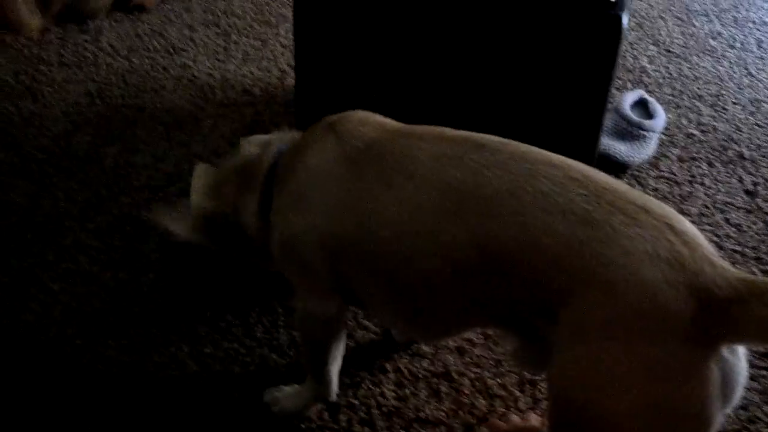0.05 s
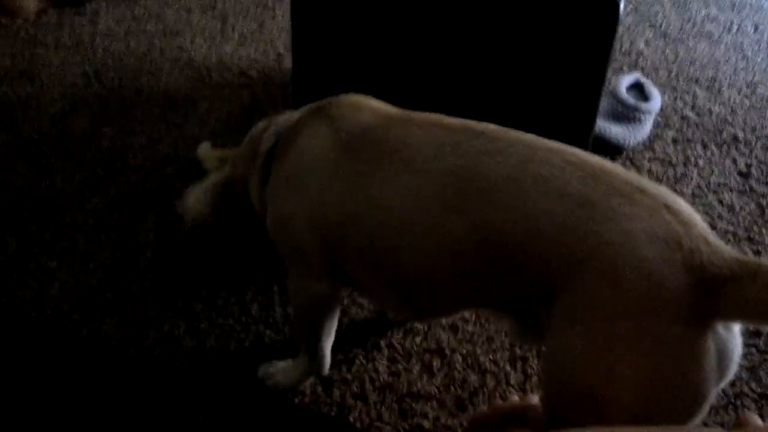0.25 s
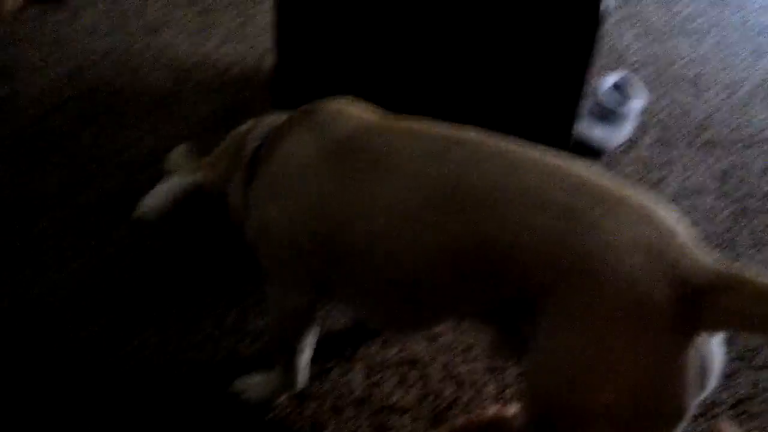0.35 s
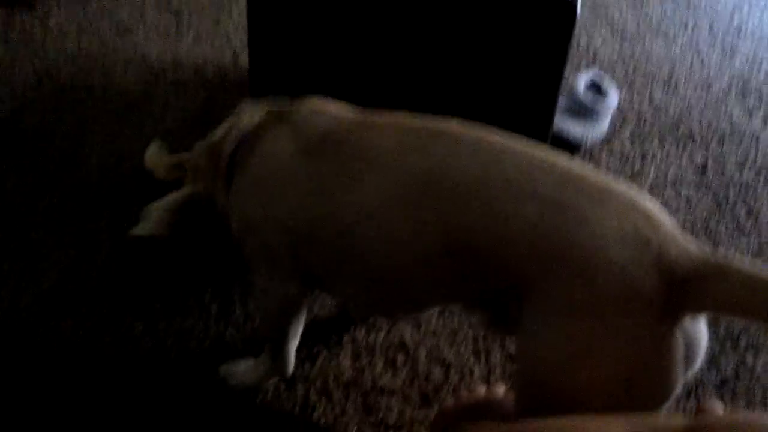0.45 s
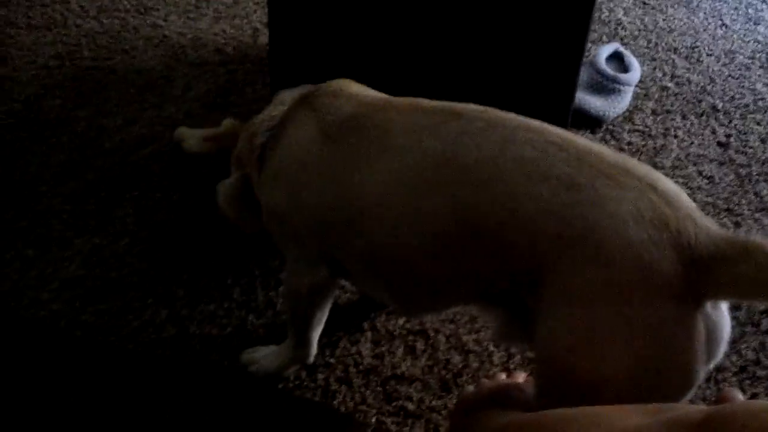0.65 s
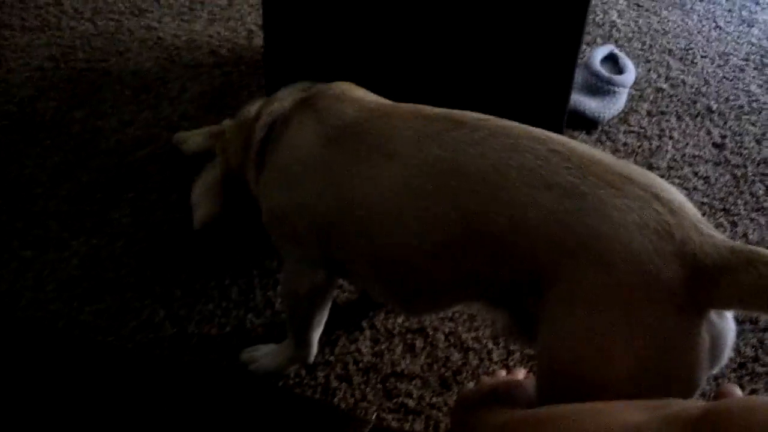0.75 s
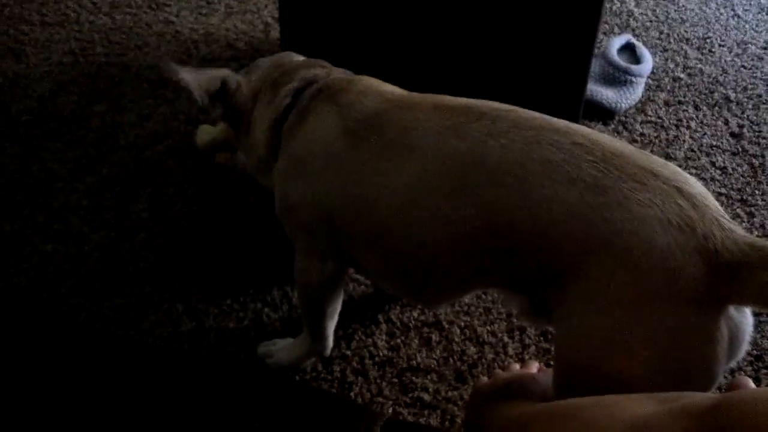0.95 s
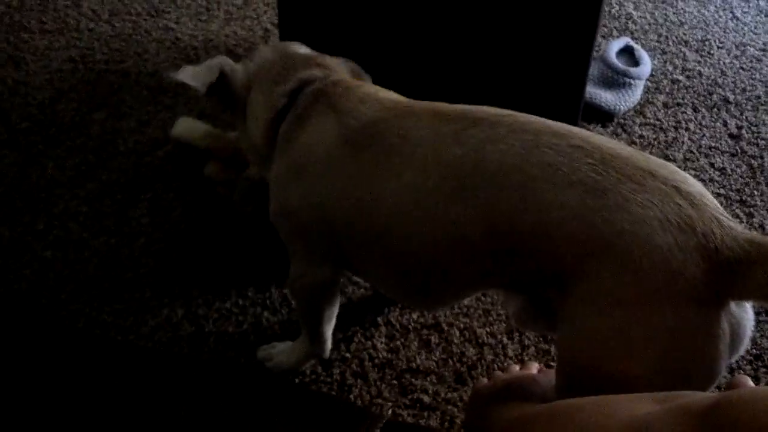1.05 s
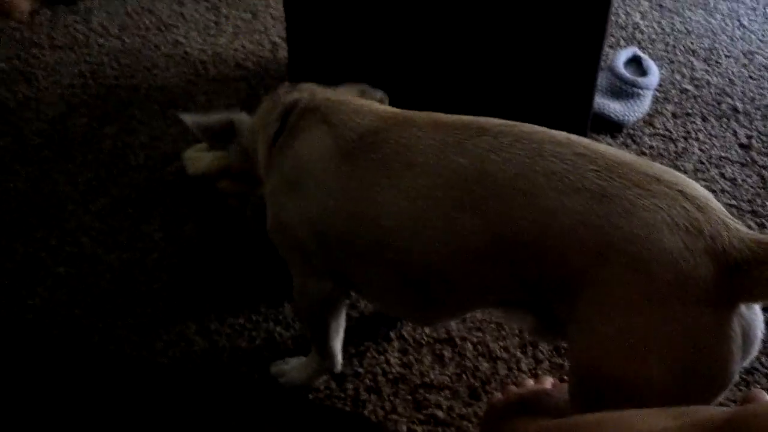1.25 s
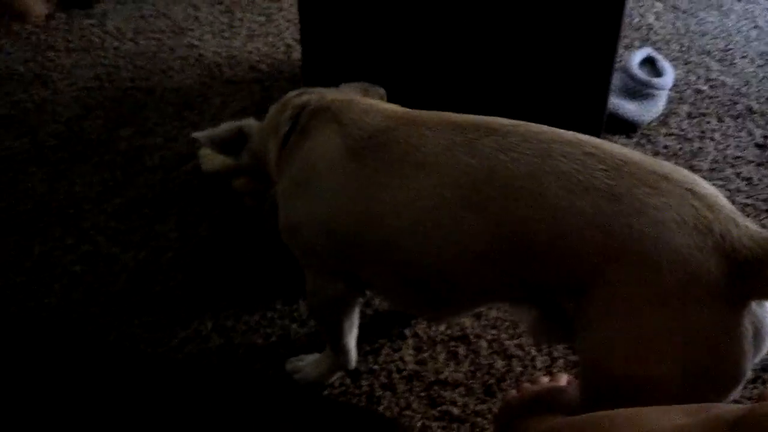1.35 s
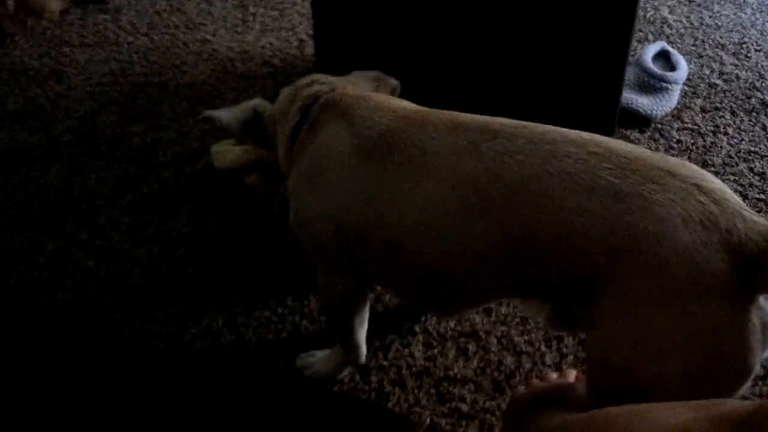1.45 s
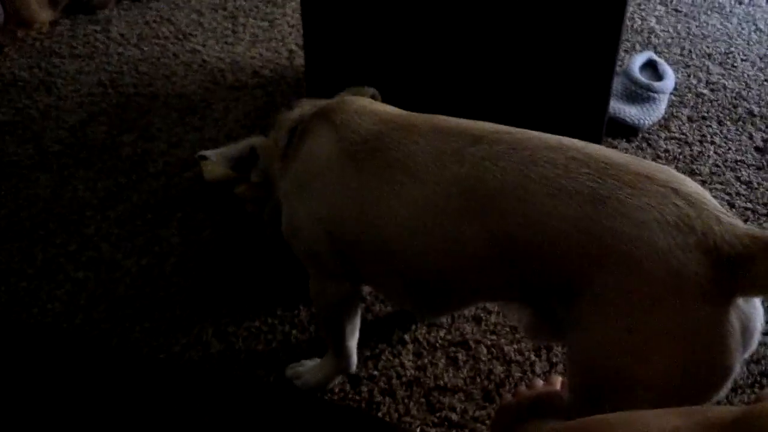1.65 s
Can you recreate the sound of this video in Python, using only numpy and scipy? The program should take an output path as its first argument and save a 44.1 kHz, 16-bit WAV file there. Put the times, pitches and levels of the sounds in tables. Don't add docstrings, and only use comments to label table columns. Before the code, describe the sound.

Three brief reedy squeaks from a dog's chew toy in the first second, the second shrillest, then quiet room air and low household rumble. Close pickup, left of centre, with a short room tail.

```python
import sys
import numpy as np
from scipy import signal
from scipy.fft import rfft, irfft, next_fast_len
from scipy.io import wavfile
from scipy.ndimage import uniform_filter1d

SR = 44100
rng = np.random.default_rng(int(sys.argv[2]) if len(sys.argv) > 2 else 0)


def log_audio(samples):
    frames = np.atleast_2d(samples).T
    limited = np.clip(frames, -1, 1)
    pcm = np.round(limited * 32767).astype(np.int16)
    wavfile.write(sys.argv[1], SR, pcm)


def invert_db(level):
    return 10 ** (np.asarray(level, dtype=float) / 20)


N = 74970

# frequency [Hz], density [dB per Hz].
FLOOR_SPECTRUM = [(40, -28.5), (110, 3), (190, -2.5), (350, -16.5), (1000, -23.5), (3000, -30.5),
                  (9000, -45), (15000, -46.5)]
# centre [s], length [s], level [dB].
LEAKS = [
    (.126, .02, -70),
    (.197, .025, -71),
    (1.47, .05, -78),
    (1.635, .075, -69),
]
# time [s], reed pitch [Hz], level [dB].
SQUEAKS = [
    [(.2112, 850, -36.5), (.2128, 1337, -31), (.234, 1421, -33.5), (.262, 1555, -24.5), (.285, 1690, -24.5),
     (.31, 1685, -32), (.326, 1472, -24.5), (.344, 1153, -43.5), (.358, 906, -51)],
    [(.639, 1050, -48.5), (.641, 1335, -31.5), (.662, 1660, -24.5), (.681, 2020, -19), (.693, 2800, -25.5),
     (.699, 3950, -50.5), (.719, 4480, -21.5), (.735, 4400, -44.5), (.75, 4400, -57)],
    [(.837, 4844, -41), (.8382, 4527, -24), (.841, 3430, -25), (.844, 3326, -23), (.846, 2188, -21),
     (.855, 1500, -29), (.861, 1205, -48), (.866, 1043, -49)],
]
# time [s], pitch [Hz], level [dB].
WHISTLES = [
    [(.262, 1660, -49.5), (.272, 1769, -30.5), (.29, 1835, -20), (.3, 1878, -40), (.311, 1637, -39)],
    [(.692, 3864, -42.5), (.696, 4240, -21.5), (.706, 4630, -20.5), (.71, 5300, -54)],
]
# frequency [Hz], gain [dB].
BODY_COLOUR = [(400, -36), (800, 1), (1500, 1), (3200, 4.5), (5200, 3.5), (8500, -6), (11000, -12),
               (15500, -10.5)]
# delay [s], level [dB], extra lag at the right microphone [s].
ECHOES = [(.0045, -8.5, 0.00011), (0.01, -0.5, 0.000081), (0.0186, -9.5, 0.00011), (.022, -7.5, .00005),
          (.028, -6.5, .00012)]
# frequency [Hz], time to fall 60 dB [s].
ROOM_T60 = [(500, 0.15), (1500, 0.38), (4000, 0.37), (7000, 0.38), (9500, 0.21), (14000, .25)]
# frequency [Hz], gain [dB].
ROOM_COLOUR = [(1200, -6.5), (2200, -10.5), (4400, -9.5), (6700, -4.5), (12000, 2)]

TOP_CUT_HZ = 15800
RIGHT_DB = -5


def rms_one(x):
    return x / np.sqrt(np.mean(x ** 2) + 1e-20)


def at_hz(points, hz):
    p = np.array(points)
    return np.interp(np.log(np.maximum(hz, 1)), np.log(p[:, 0]), p[:, 1])


def drift(rate_hz):
    r = np.exp(-2 * np.pi * rate_hz / SR)
    noise = rng.standard_normal(N + SR)
    return rms_one(signal.lfilter([1], [1, -2 * r, r * r], noise)[SR:])


def diffuse(size):
    spacing_m, most_alike = .12, .96
    mid, side = rfft(rng.standard_normal((2, size)))
    hz = np.fft.rfftfreq(size, 1 / SR)
    alike = most_alike * np.sinc(2 * hz * spacing_m / 343)
    pair = np.sqrt(1 + alike) * mid + np.sqrt(1 - alike) * side * [[1], [-1]]
    return hz, pair / np.sqrt(2)


def bands(hz):
    steps = 2 * np.log2(np.maximum(hz, 1) / 30)
    return [(30 * 2 ** (k / 2), np.clip(1 - abs(steps - k), 0, 1)) for k in range(20)]


def background():
    level_db, patchy_db, calm_hz = -51, 4.5, 1500
    right_db, right_lag_s = -3.5, -0.00022
    hz, noise = diffuse(N)
    noise = noise * invert_db(at_hz(FLOOR_SPECTRUM, hz))
    noise[1] *= invert_db(right_db) * np.exp(-2j * np.pi * hz * right_lag_s)
    shared = drift(1.3)
    total = np.zeros((2, N))
    for centre, window in bands(hz):
        flicker_db = patchy_db / (1 + centre / calm_hz) * (0.23 * shared + drift(6.9))
        total += irfft(noise * window, N) * invert_db(flicker_db)
    return invert_db(level_db) * rms_one(total)


def body(hz):
    pipe_hz, width_hz, pipe_db = 6700, 1300, 9
    resonance_db = pipe_db / (1 + (2 * (hz - pipe_hz) / width_hz) ** 2)
    return invert_db(at_hz(BODY_COLOUR, hz) + resonance_db)


def above(hz):
    return 1 / (1 + (9500 / np.maximum(hz, 1)) ** 6)


def rushing_air():
    hz = np.fft.rfftfreq(N, 1 / SR)
    colour = body(hz) * invert_db(7 * above(hz))
    return rms_one(irfft(rfft(rng.standard_normal(N)) * colour, N))


def leaks(air):
    t, out = np.arange(N) / SR, np.zeros(N)
    for s, length, db in LEAKS:
        out += invert_db(db) * air * np.exp(-(2 * (t - s) / length) ** 2)
    return out


def reed(air):
    jitter, shimmer_db, air_db = .0035, .9, -19
    full_db = -24
    dulling = .09
    lines_top_db = -4
    t, out = np.arange(N) / SR, np.zeros(N)
    wobble, shimmer = drift(100), [drift(120) for k in range(14)]
    for rows in SQUEAKS:
        s, hz, db = np.transpose(rows)
        pitch = np.exp(np.interp(t, s, np.log(hz))) * (1 + jitter * wobble)
        phase = 2 * np.pi * np.cumsum(pitch) / SR
        level_db = np.interp(t, s, db)
        slack_db = np.clip(level_db - full_db, -30, 0)
        tone = np.zeros(N)
        for k in range(1, 15):
            line_hz = k * pitch
            line_db = dulling * (k - 4) * slack_db + lines_top_db * above(line_hz)
            line_db += shimmer_db * np.sqrt(k) * shimmer[k - 1]
            gain = invert_db(line_db) * body(line_hz) * (line_hz < TOP_CUT_HZ)
            tone += gain * np.sin(k * phase + k * k)
        pulsing_air = invert_db(air_db) * air * (1 + np.cos(phase))
        sounding = (t > s[0]) & (t < s[-1])
        out += invert_db(level_db) * sounding * (tone + pulsing_air)
    return out


def whistles():
    t, out = np.arange(N) / SR, np.zeros(N)
    for rows in WHISTLES:
        s, hz, db = np.transpose(rows)
        phase = 2 * np.pi * np.cumsum(np.interp(t, s, hz)) / SR
        sounding = (t > s[0]) & (t < s[-1])
        out += invert_db(np.interp(t, s, db)) * sounding * np.sin(phase)
    return out


def squeaker():
    air = rushing_air()
    return leaks(air) + reed(air) + whistles()


def scatter():
    burst = rng.standard_normal(400) * np.exp(-np.arange(400) / SR / .002)
    return burst / np.sqrt(np.sum(burst ** 2))


def room_tail():
    level_db, right_db, build_s = -1.5, -3.5, .022
    size = SR // 2
    t = np.arange(size) / SR
    hz, noise = diffuse(size)
    tail = np.zeros((2, size))
    for centre, window in bands(hz):
        tail += irfft(noise * window, size) * invert_db(-60 * t / at_hz(ROOM_T60, centre))
    tail *= 1 - np.exp(-(t / build_s) ** 2)
    tail /= np.sqrt(np.mean(np.sum(tail ** 2, axis=1)))
    return invert_db([[level_db], [level_db + right_db]]) * tail


def room(x):
    right_lag_s = .000135
    echo_tilt_db = 3.5
    size = next_fast_len(N + SR // 2)
    hz = np.fft.rfftfreq(size, 1 / SR)
    turn = -2j * np.pi * hz
    tail = rfft(room_tail(), size) * invert_db(at_hz(ROOM_COLOUR, hz))
    paths = np.array([np.ones(len(hz)), invert_db(RIGHT_DB) * np.exp(turn * right_lag_s)])
    tilt = invert_db(echo_tilt_db * np.log2(np.clip(hz, 500, 7000) / 7000))
    for s, db, lag in ECHOES:
        surface = tilt * rfft(scatter(), size)
        paths = paths + invert_db([[db], [db + RIGHT_DB]]) * surface * np.exp(turn * [[s], [s + lag]])
    return irfft(rfft(x, size) * (paths + tail), size)[:, :N]


def scene():
    return room(squeaker()) + background()


def band_limit(x):
    return signal.sosfilt(signal.butter(12, 16610, fs=SR, output="sos"), x)


def record(dry):
    from_db, slope, release_db_per_s, attack_s = -34.5, 0.56, 7, 0.039
    hiss_db, cross_feed, cross_lag = -83, .95, 16
    power = uniform_filter1d(np.mean(dry ** 2, axis=0), size=441, origin=220)
    level_db = 10 * np.log10(power + 1e-12)
    release = release_db_per_s * np.arange(N) / SR
    wanted_db = slope * np.maximum(level_db - from_db, 0)
    held_db = np.maximum.accumulate(wanted_db + release) - release
    r = np.exp(-1 / (attack_s * SR))
    cut_db = signal.lfilter([1 - r], [1, -r], np.maximum(held_db, 0))
    x = dry * invert_db(-cut_db) + invert_db(hiss_db) * rng.standard_normal(dry.shape)
    other_side = np.pad(x[::-1], ((0, 0), (cross_lag, 0)))[:, :N]
    x = x - cross_feed * other_side
    top_cut = signal.cheby2(20, 70, TOP_CUT_HZ + 400, fs=SR, output="sos")
    return band_limit(signal.sosfilt(top_cut, x))


dry = scene()
out = record(dry)
log_audio(out)
```